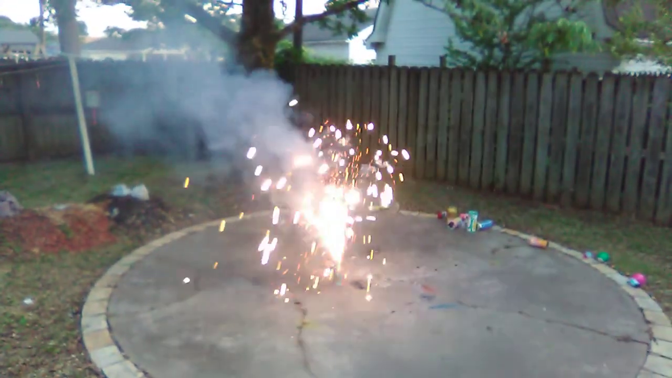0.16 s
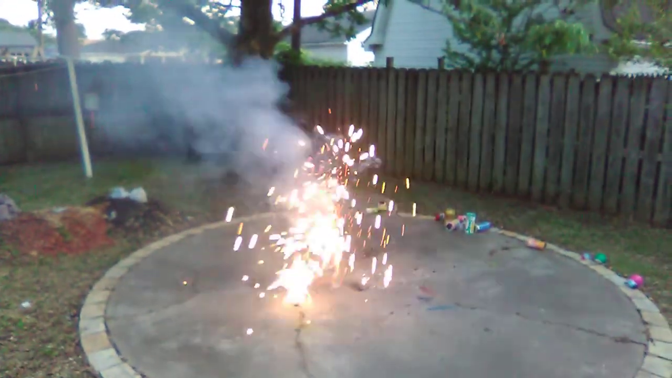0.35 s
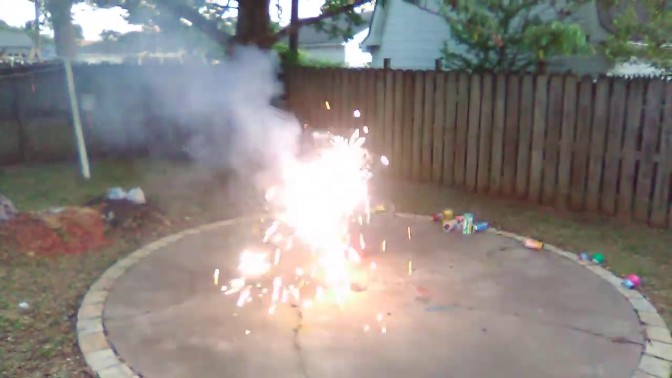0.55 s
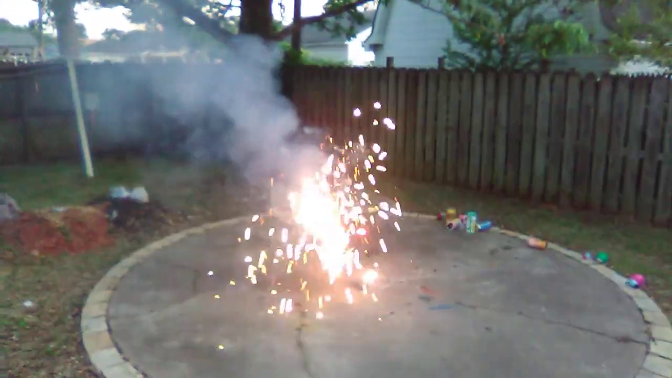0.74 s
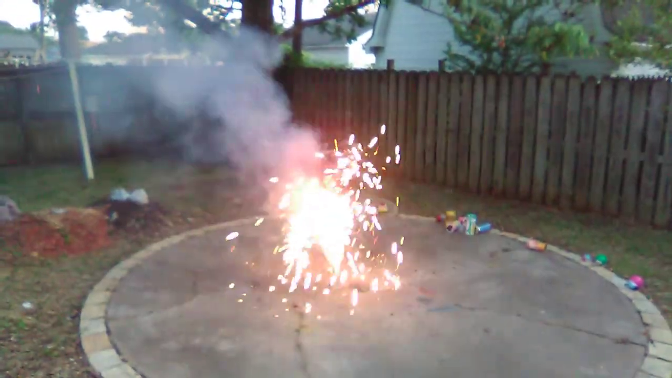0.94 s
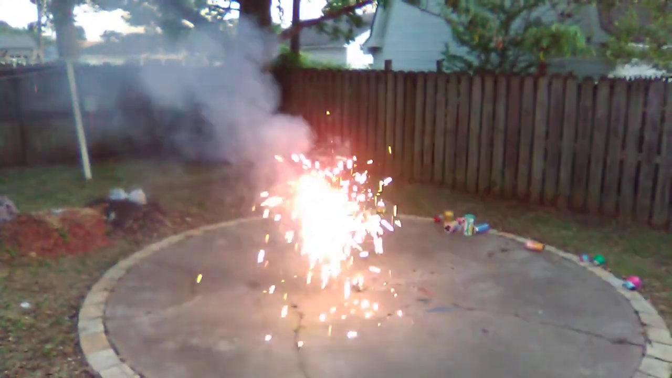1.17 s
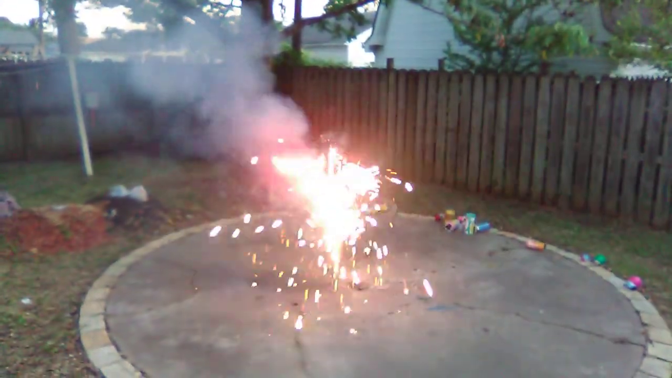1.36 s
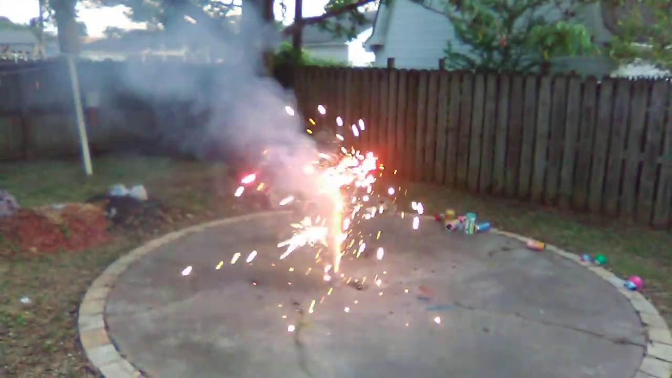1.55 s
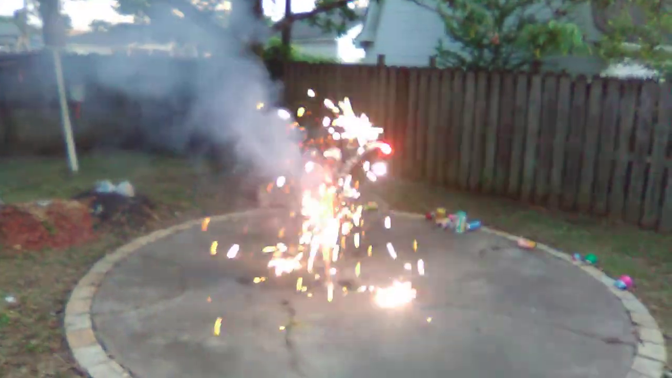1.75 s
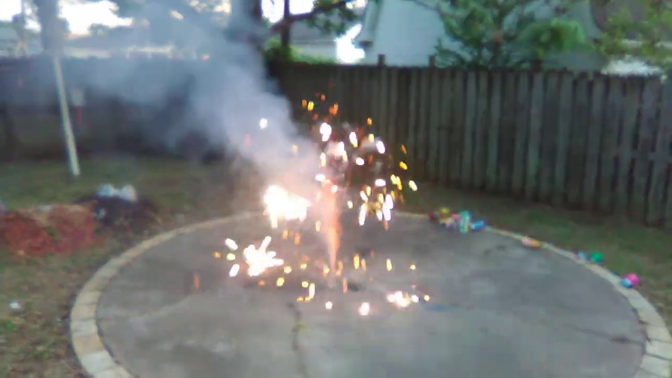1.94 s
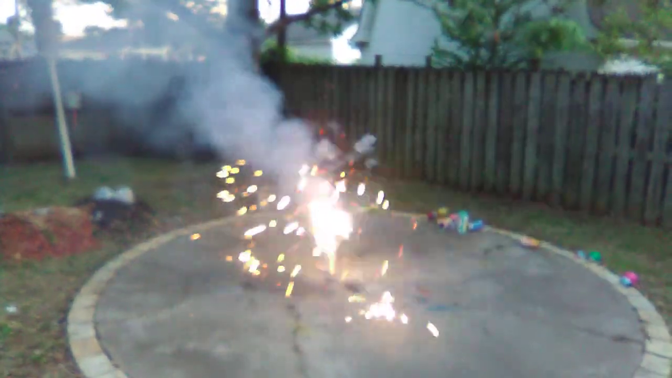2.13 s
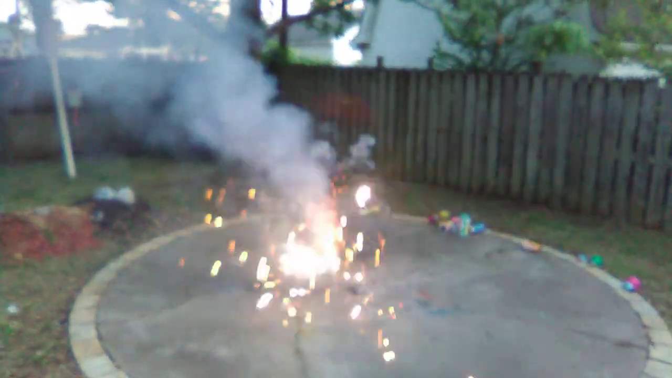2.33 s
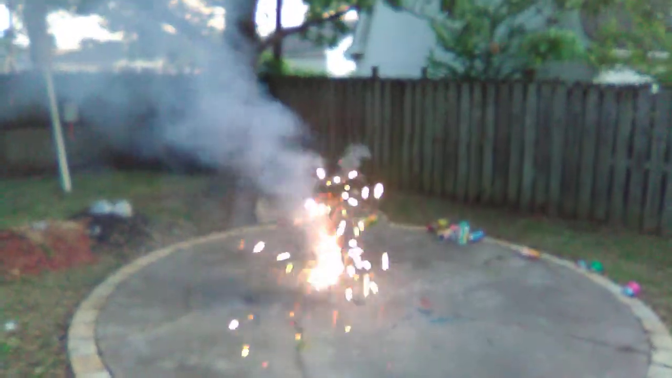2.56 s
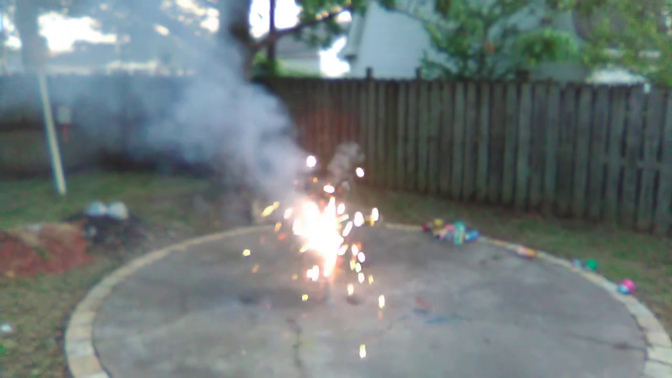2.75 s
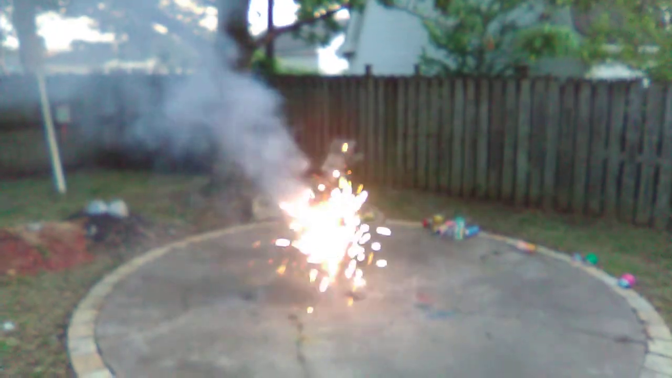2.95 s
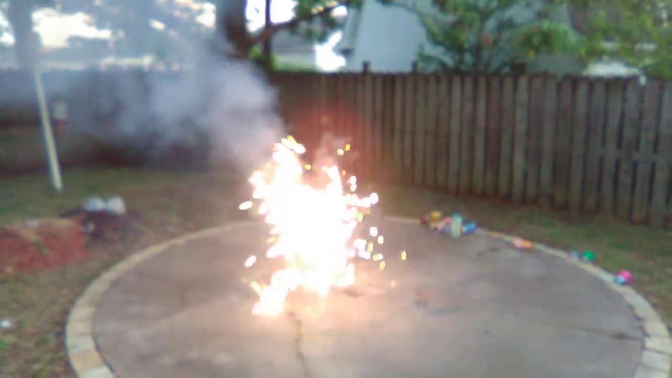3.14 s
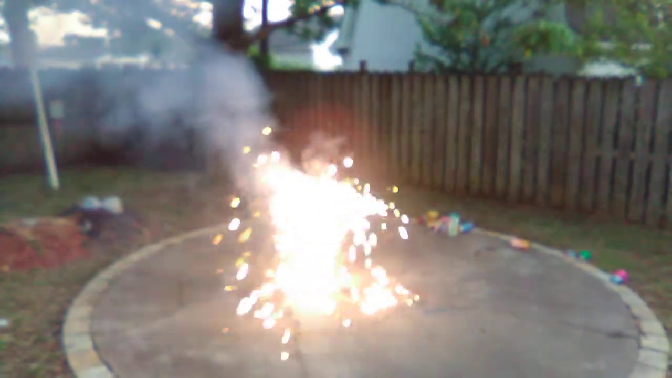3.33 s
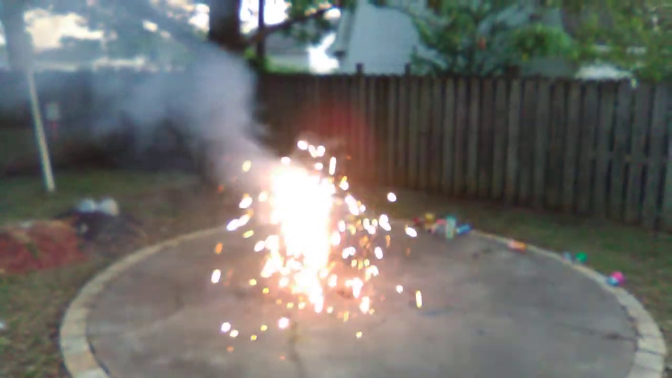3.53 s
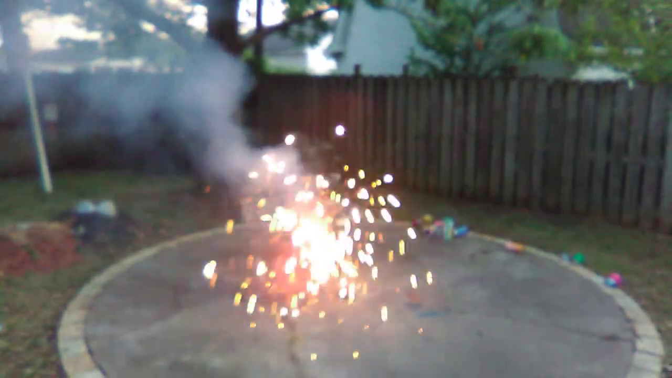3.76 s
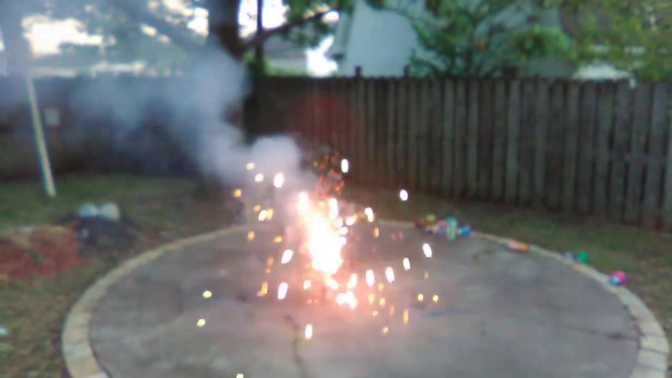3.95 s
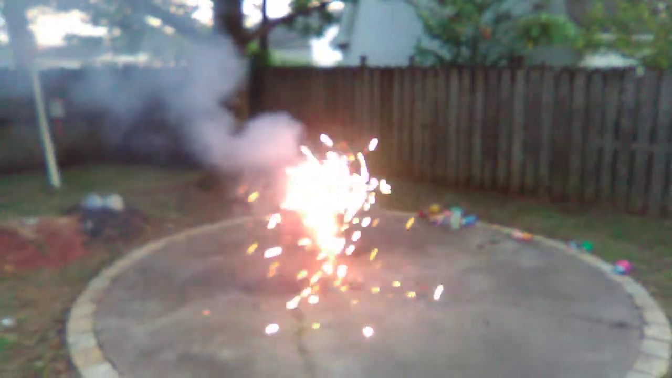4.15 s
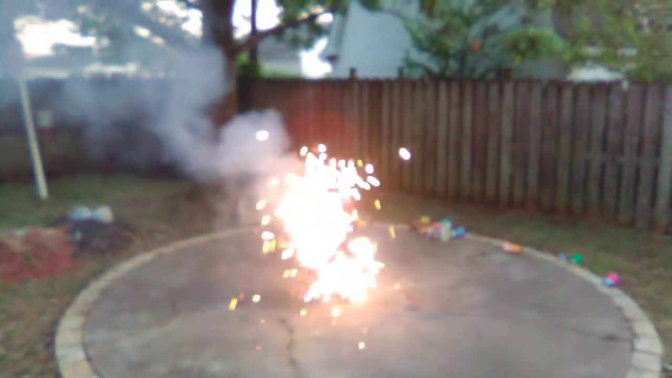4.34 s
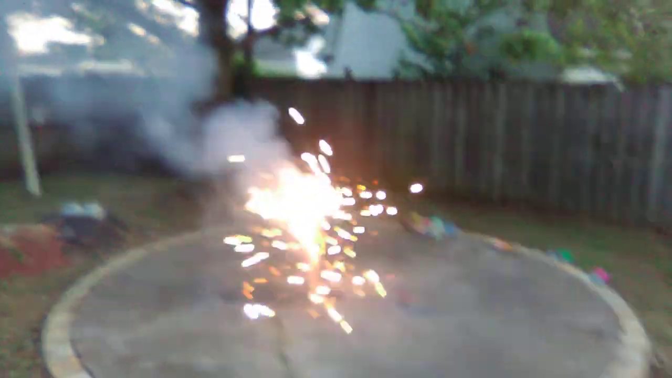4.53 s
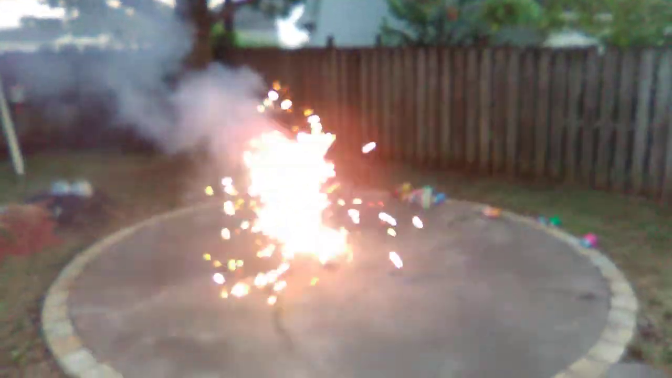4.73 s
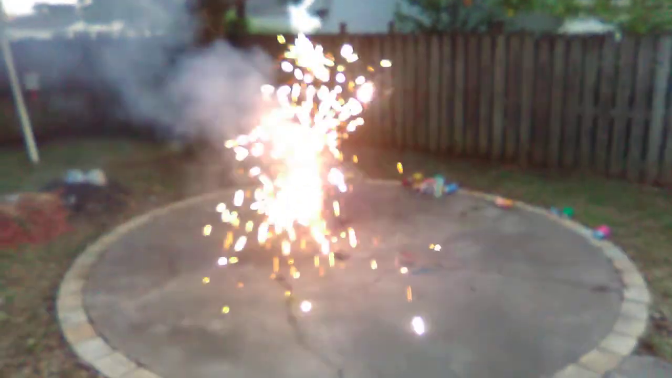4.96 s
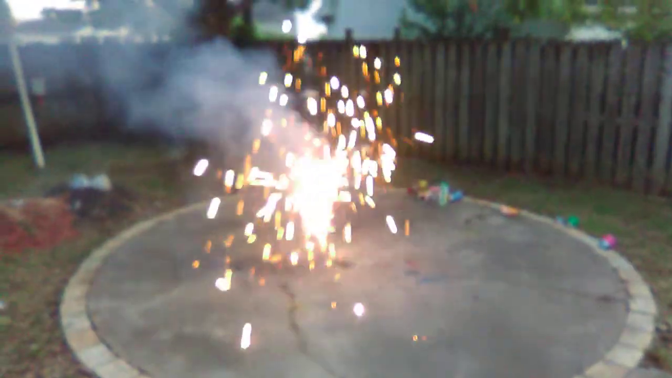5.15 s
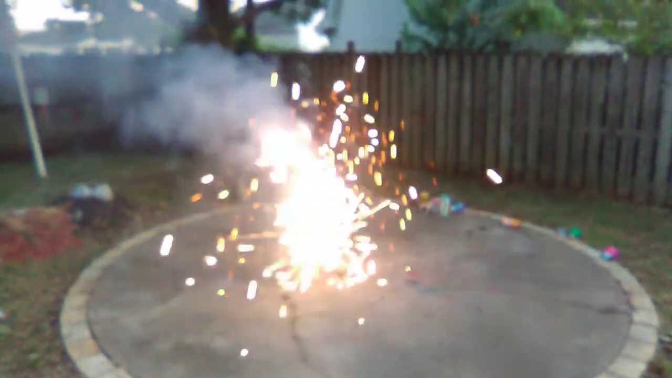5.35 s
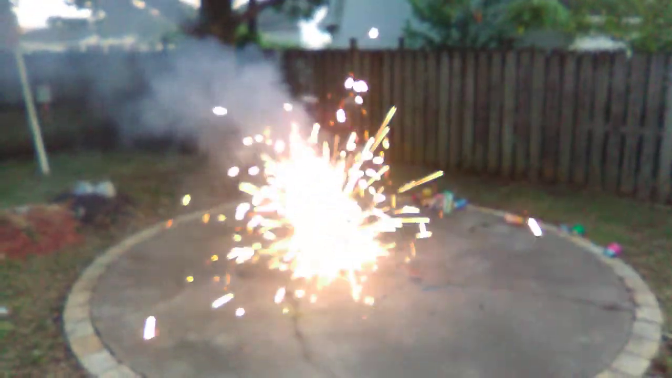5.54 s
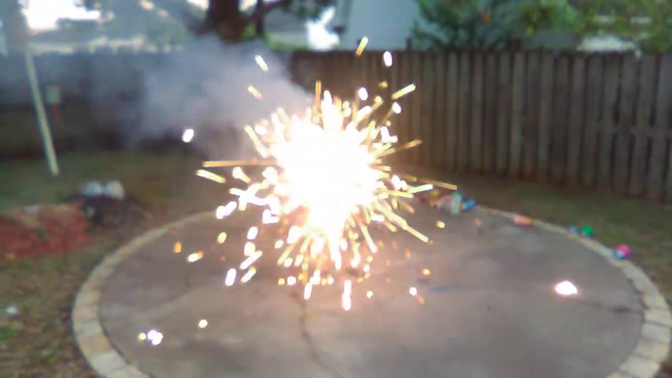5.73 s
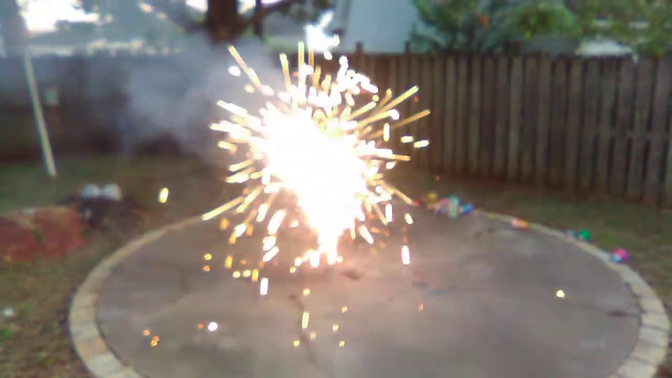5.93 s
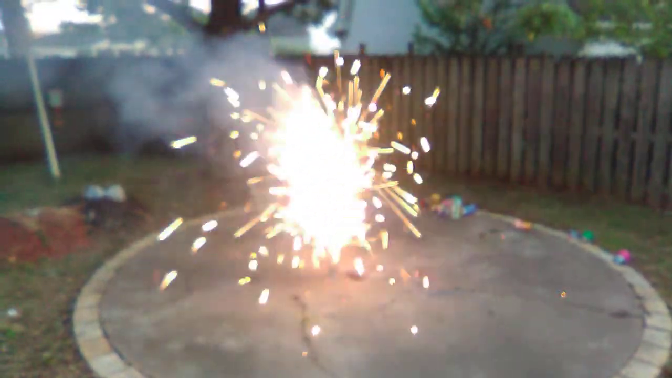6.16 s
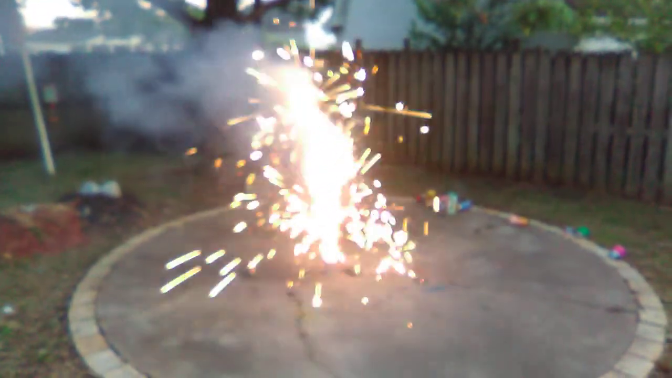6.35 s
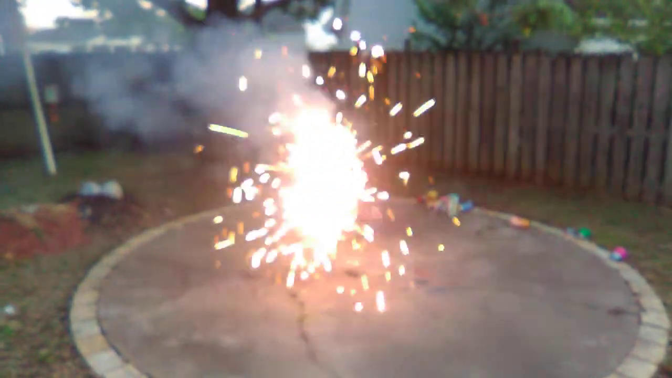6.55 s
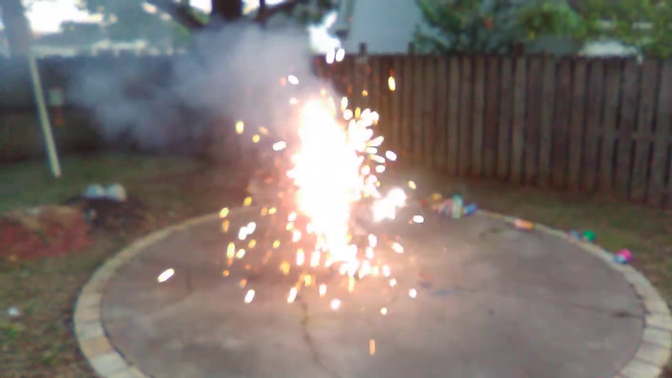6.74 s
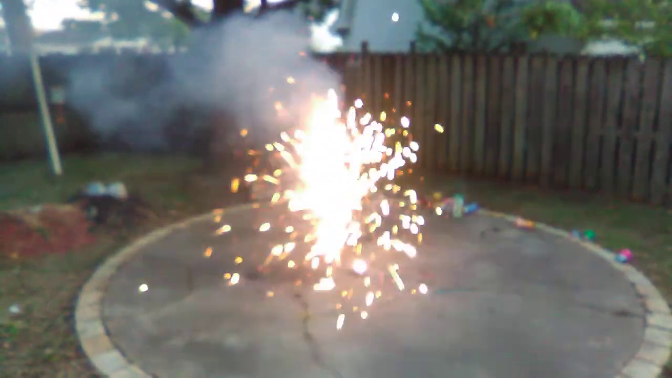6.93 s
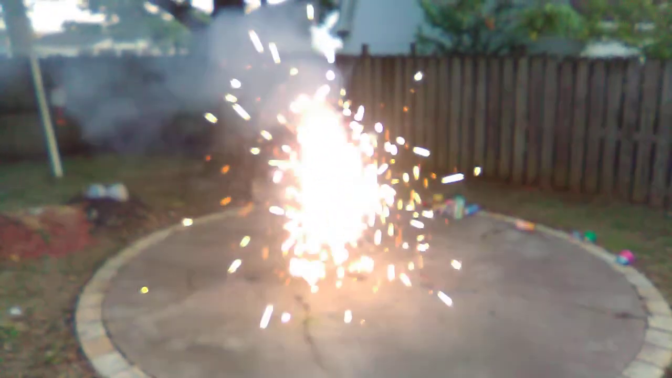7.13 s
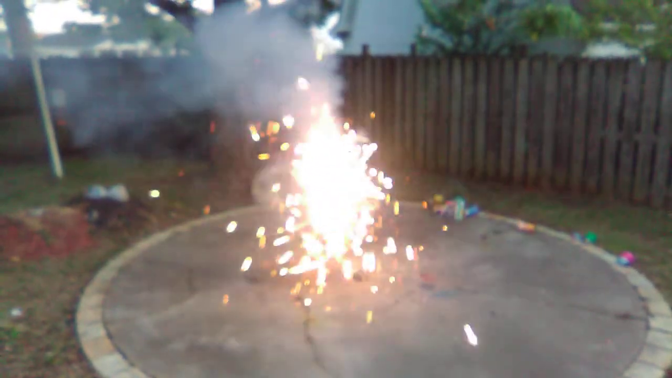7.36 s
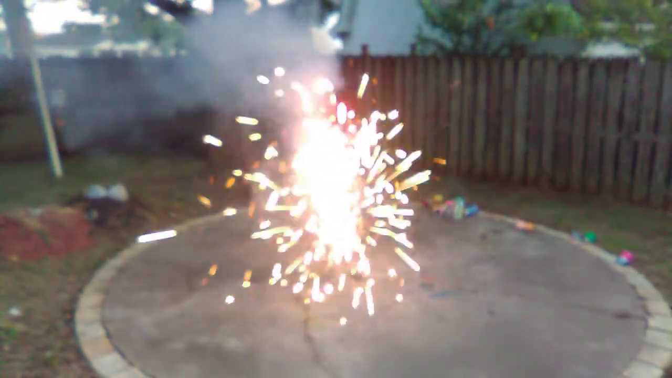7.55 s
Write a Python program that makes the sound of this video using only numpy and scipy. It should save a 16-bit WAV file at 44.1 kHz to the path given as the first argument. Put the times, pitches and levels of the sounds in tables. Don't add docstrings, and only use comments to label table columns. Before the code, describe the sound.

Close stereo pickup of a backyard firework: faint fizzing jet, low flame flutter, grainy spits and irregular snaps, some crisp and near, some dull in smoke. After a few much louder cracks, a sudden blast opens a roaring wall of crackle. It holds for about a second, then breaks into uneven bursts, distorted, with low bumps and momentary muffling, especially on the right.

```python
import sys
import numpy as np
from scipy import signal
from scipy.fft import rfft, irfft, next_fast_len
from scipy.io import wavfile
from scipy.ndimage import uniform_filter1d, map_coordinates

SR = 44100
rng = np.random.default_rng(int(sys.argv[2]) if len(sys.argv) > 2 else 0)


def waveform_to_disk(signal):
    frames = np.transpose(np.atleast_2d(signal))
    scaled = np.clip(frames, -1, 1) * 32767
    samples = np.round(scaled).astype(np.int16)
    wavfile.write(sys.argv[1], SR, samples)


def volts(x):
    e = np.asarray(x, float) / 20
    return 10 ** e


N = 339129

# start_s, peak_db, t60_s
THUMPS = [(0.209, -52, 0.22), (0.494, -51, 0.22), (0.59, -52, 0.22), (0.781, -51, 0.22), (1.034, -53, 0.22),
          (1.139, -52, 0.22), (1.282, -53, 0.22), (1.692, -43, 0.22), (2.014, -55, 0.22),
          (2.278, -56, 0.22), (2.841, -37, 0.22), (3.135, -46, 0.22), (3.184, -41, 0.22),
          (3.386, -43, 0.22), (3.779, -51, 0.22), (4.006, -52, 0.22), (4.223, -53, 0.22),
          (4.652, -41, 0.22), (4.755, -50, 0.22), (4.978, -43, 0.22)]
# start_s, peak_db, pitch_hz, t60_s
PUFFS = [(0.346, -30.5, 233, 0.16), (0.601, -32, 236, 0.12), (0.49, -40, 520, 0.3), (1.04, -37, 520, 0.5),
         (1.083, -29.5, 260, 0.4), (1.324, -38, 243, 0.24), (1.553, -37, 267, 0.15),
         (1.688, -31, 514, 0.16), (3.017, -41.5, 517, 0.21), (3.182, -34, 165, 0.22),
         (3.493, -35, 322, 0.13), (3.79, -23.5, 352, 0.12), (4.218, -33.5, 425, 0.21),
         (4.633, -32, 241, 0.21), (4.729, -27, 335, 0.11), (0.74, -37, 280, 0.2), (2.07, -47, 250, 0.3),
         (2.68, -42, 300, 0.3)]
# time_s, vigour_db, sharpness_db, left_minus_right_db
JET = [(0, -59, 0, 0), (.5, -55, 0, -2), (.8, -56, .8, -3.5), (1.5, -57, 1.5, -1.5), (1.75, -60, 0, -3.5),
       (2.3, -63, -3, -2.5), (2.6, -62, -3, -3), (2.99, -62, 4, -2.5), (3.1, -49, 5, -3.5),
       (3.52, -60, 4, -2), (3.63, -60, 3, -3), (3.9, -64, 3, 2.5), (4.05, -58, -6, 3.5),
       (4.26, -48, -11, 5.5), (4.58, -51, -7, 2.5), (4.75, -46, -7, 2), (4.9, -49, -11, 2),
       (5.22, -51, -3, 2.5)]
# frequency_hz, density_db (per Hz)
JET_COLOUR = [(90, -49), (140, -4.5), (240, -9.5), (500, -9), (960, -12.5), (1330, -7.5), (2450, -5),
              (4870, -10), (7010, -3), (14500, -14)]
# start_s, peak_db, rise_s, sizzle_minus_rush_db
FLARES = [(.01, -48, .02, 1.5), (.18, -48, .02, 1.5), (.33, -46, .03, 1.5), (.67, -47, .022, 0),
          (.85, -54, .05, 1.5), (1.385, -47, .03, 3), (1.54, -49, .015, 2.5), (1.66, -49, .03, -7),
          (3.02, -46, .04, 3), (3.81, -61, .04, 14), (4.63, -41, .025, -1.5), (4.94, -46, .025, 4),
          (5.1, -34, .014, 4)]
# start_s, length_s, gain_db
TOP_LIFTS = [
    (.18, .09, 7),
    (.33, .09, 3),
    (.48, .25, 5),
    (2.41, .16, 12),
    (2.83, .13, 3),
    (3.85, .15, -10),
    (4.07, .52, 11),
    (4.75, .2, 8),
]
# start_s, crack_peak_db, ring_hz, wash_t60_s
BARE_POPS = [(0.3186, -33, 1320, .34), (0.3416, -30, 3200, .25), (0.503, -33, 1500, .2),
             (0.4828, -32, 3530, .55), (0.5935, -30, 3370, .23), (1.086, -32, 726, .32),
             (1.1395, -23, 3320, .17), (1.4084, -28, 3160, .2), (1.8273, -36, 2550, .17),
             (1.9175, -39, 1420, .2), (2.0166, -35, 1340, .14), (2.0835, -39, 3560, .15),
             (2.2188, -31, 2310, .12), (2.3805, -31, 2520, .3), (2.7595, -47, 2540, .28),
             (2.8567, -24.5, 2250, .5), (3.018, -32, 2600, .83), (3.2284, -28, 1800, .46),
             (3.322, -36, 2570, .49), (3.3746, -29, 1190, .45), (3.4507, -27.5, 1340, .34),
             (3.572, -27, 3500, .1), (3.6535, -24.5, 2460, .26), (3.766, -27.5, 1550, .28),
             (3.7798, -30, 2600, .2), (4.6001, -24, 2760, .54), (4.6692, -10, 3370, .7),
             (5.0015, -10, 2500, .4), (5.0841, -4, 2530, .16), (5.1058, -17, 3740, .24)]
# start_s, crack_peak_db, ring_hz, wash_t60_s
VEILED_POPS = [(0.2882, -46, 1570, .2), (0.4686, -34, 3250, .33), (1.0363, -36, 1860, .27),
               (1.281, -46, 2640, .25), (1.326, -43, 1920, .84), (1.7697, -39, 1820, .14),
               (2.1844, -44, 940, .36), (2.2813, -34, 1500, .16), (2.4823, -40, 1740, .42),
               (2.607, -43, 1490, .41), (2.645, -43, 2550, .46), (2.6895, -41, 3120, .33),
               (2.826, -31, 1590, .15), (3.9766, -45, 2460, .39), (4.008, -42.5, 2670, .39),
               (4.0711, -35, 2550, .22), (4.1323, -28, 2320, .56), (4.22, -34, 2300, .4),
               (4.351, -35, 1710, .58), (4.4132, -35, 1320, .18), (4.5342, -33, 3070, .18),
               (4.869, -29.5, 2120, .098)]
# start_s, peak_db, left_minus_right_db
SNAPS = [(0.3192, -30, 0.0), (0.3416, -28, -1.0), (0.5955, -26, -5.5), (1.034, -32, 0.0),
         (1.0874, -30, -2.0), (1.1393, -18, -3.0), (1.282, -39, -0.5), (1.3254, -37, -5.5),
         (1.4092, -20, -0.5), (1.8282, -33, -1.5), (2.0158, -39, -3.0), (2.0852, -39, 2.5),
         (2.1844, -45, -2.5), (2.2184, -27, -8.0), (2.2822, -36, -1.5), (2.3795, -29, 2.0),
         (2.4254, -29, -2.0), (2.4803, -37, -7.5), (2.607, -43, 0.0), (2.7591, -44, 0.5),
         (2.8275, -32, -8.0), (2.8374, -28, -7.0), (2.8564, -21, -3.0), (3.016, -28, -4.5),
         (3.2271, -24, -2.0), (3.3752, -26, -5.5), (3.4511, -26, -4.0), (3.5713, -25, -5.5),
         (3.6536, -26, -2.0), (3.7668, -25, -2.5), (3.9794, -41, 6.0), (4.0726, -29, 4.5),
         (4.1315, -25, 1.5), (4.349, -31, 6.5), (4.5351, -30, 6.5), (4.6014, -23, 0.5), (4.6683, -10, 2.0),
         (4.8708, -21, 5.0), (5.001, -9, -1.5), (5.0838, -4, -1.0)]
# start_s, peak_db, pitch_hz
SPITS = [(0.028, -42, 1450), (0.289, -41, 1570), (0.319, -38, 1380), (0.381, -38, 1370), (0.6, -38, 2140),
         (0.694, -39, 2500), (0.778, -42, 2250), (1.018, -42, 681), (1.035, -36, 1980), (1.08, -34, 1280),
         (1.138, -38, 1840), (1.325, -42, 1930), (1.694, -37, 2290), (1.775, -38, 1910), (2.016, -41, 1350),
         (2.187, -47, 1070), (2.282, -37, 902), (2.381, -39, 1570), (2.503, -42, 1810), (2.607, -43, 1520),
         (2.646, -40, 2420), (2.827, -33, 1610), (2.857, -37, 2270), (2.917, -38, 1570), (3.015, -47, 2370),
         (3.036, -40, 1730), (3.153, -36, 891), (3.182, -35, 1110), (3.229, -31, 1840), (3.282, -32, 1510),
         (3.387, -36, 1140), (3.45, -38, 1310), (3.489, -38, 1530), (3.571, -44, 1510), (3.651, -36, 1590),
         (3.657, -33, 1680), (3.768, -43, 1550), (4.075, -35, 2090), (4.132, -33, 2210), (4.216, -35, 2160),
         (4.233, -33, 2190), (4.27, -35, 2390), (4.327, -36, 2280), (4.35, -36, 1730), (4.369, -33, 1450),
         (4.412, -35, 1330), (4.535, -38, 2330), (4.601, -29, 2420), (4.655, -30, 2500), (4.668, -24, 2080),
         (4.73, -28, 2400), (4.783, -32, 2020), (4.804, -34, 1420), (4.871, -31, 2110), (4.949, -37, 1840),
         (4.98, -30, 1840), (5.001, -22, 2410), (5.042, -35, 2120), (5.083, -13, 2430), (5.115, -26, 1740)]
# start_s, sizzle_db, hold_s, fade_db_per_s, rush_minus_sizzle_db
VOLLEYS = [(5.239, -10.5, .04, 265, -3), (5.35, -12.5, .1, 120, -4), (5.47, -13, .9, 150, -2.5),
           (6.39, -14, .09, 190, -3), (6.537, -12.5, .09, 135, -5), (6.738, -13, .004, 900, -7),
           (6.742, -19, .03, 150, -6), (6.8, -13, .03, 100, -3), (6.84, -12, .035, 280, -5),
           (6.936, -10.5, .03, 250, -7), (7.027, -11.5, .11, 100, -8), (7.191, -11.5, .05, 80, -9),
           (7.29, -12.5, .05, 90, -6.5), (7.423, -13.5, .04, 250, -10), (7.504, -16, .008, 200, -12),
           (7.534, -12, .115, 300, -10)]
# start_s, crack_peak_db, left_minus_right_db
BLASTS = [(5.2387, -6, -2), (5.351, 5, 1), (6.5368, -3, 0), (6.7383, 1.5, 10), (6.7615, -6, 0),
          (6.7996, 5, 5), (6.8099, 0, 12), (6.9358, 5, 5), (7.0263, 5, 13), (7.1927, 6, -9),
          (7.4238, -1, -6), (7.5037, -3.5, 6.5), (7.551, -4, -10)]
# frequency_hz, density_db (per Hz)
VOLLEY_COLOUR = [(180, -31), (300, -11.5), (590, -12.5), (810, -8), (1450, -8), (1970, -4), (2960, -5),
                 (4900, -4.5), (6760, 0.5), (11700, -3), (14300, 0.5)]
# frequency_hz, left_minus_right_db
VOLLEY_BALANCE = [(300, 4), (600, 1), (1300, 3), (2500, 2.5), (4500, 2), (6500, 5.5), (9000, -2),
                  (14000, -3)]
# start_s, bias_kick (full scale = 1), deafening_db
LEFT_KICKS = [(5.2414, -.42, 6.5), (5.4648, -.64, 9), (5.5147, -.52, 7), (5.5656, -.76, 12),
              (5.573, .67, 4), (5.6072, .5, 4), (5.773, .42, 2), (5.9434, -.32, 8), (5.9692, -.36, 10),
              (5.9765, .26, 2), (6.0104, -.41, 0), (6.3885, -.3, 0), (7.3105, .59, 5), (7.435, .3, 1.1),
              (7.5675, -.7, 4)]
# start_s, bias_kick (full scale = 1), deafening_db
RIGHT_KICKS = [(5.2398, -1.13, 30), (5.3494, -.46, 2), (5.4639, -.67, 5.8), (5.515, .36, 6.9),
               (5.542, -.84, 2), (5.5724, .75, 8), (5.6571, -.58, 10), (5.728, 1.5, 7.6),
               (5.7728, -.7, 1.6), (5.8738, -.77, 8), (5.9052, -.69, 2), (5.9688, .9, 4.5),
               (6.0104, -.79, 9.6), (6.1138, .98, .9), (6.1348, -.53, .6), (6.148, .88, 18),
               (6.1921, -.8, 12), (6.2818, -1.04, 7), (6.3531, 1.24, 5), (6.3914, 1.01, 11),
               (6.4208, -.77, 1.1), (6.8005, -.52, 1.1), (6.8323, .88, 26), (7.0282, -.65, 17),
               (7.0865, .88, 2.7), (7.0988, -.6, 17), (7.19, -.67, 6), (7.3045, .79, .8), (7.533, -.58, 38),
               (7.5519, 1.3, 5)]
# start_s, length_s, loss_db, fade_s
RIGHT_STALLS = [
    (5.239, .017, 61, .003),
    (5.255, 0.0085, 15, .002),
    (5.288, 0.046, 57, 0.046),
    (6.803, 0.0055, 10, 0.0022),
    (6.82, .014, 18, .004),
    (6.893, .034, 22, 0.035),
    (6.936, 0.0062, 38, .002),
    (7.528, 0.012, 30, .003),
]

SPLIT_HZ, TOP_HZ, CUTOFF_HZ = 5000, 11950, 14200


def rms_one(x):
    return x / np.sqrt(np.mean(x ** 2) + 1e-20)


def add_at(out, start_s, sound):
    out[:, round(start_s * SR):][:, :sound.shape[-1]] += sound


def in_time(rows):
    time_s, *columns = np.transpose(rows)
    return [np.interp(np.arange(N) / SR, time_s, column) for column in columns]


def sides(pan_db):
    return volts(np.array([pan_db / 2, -pan_db / 2]))


def drift(rate_hz):
    r = np.exp(-80 * np.pi * rate_hz / SR)
    slow = signal.lfilter([1], [1, -2 * r, r * r], rng.standard_normal(N // 40 + 2002))[2000:]
    return np.interp(np.arange(N) / 40, np.arange(len(slow)), rms_one(slow))


def ring(x, hz, t60_s):
    r, w = volts(-60 / (t60_s * SR)), 2 * np.pi * hz / SR
    return signal.lfilter([0, np.sin(w)], [1, -2 * r * np.cos(w), r * r], x + 1e-18)


def high_pass(x, order, hz):
    return signal.sosfilt(signal.butter(order, hz, "high", fs=SR, output="sos"), x)


def crackle(per_s, spread_db, alike, echo_db):
    snaps = (rng.random((3, N)) < per_s / SR) * rng.choice([-1, 1], (3, N))
    snaps = rms_one(snaps * volts(spread_db * np.minimum(rng.exponential(1, (3, N)), 4)))
    mix = snaps + volts(echo_db) * rng.standard_normal((3, N))
    return np.sqrt(alike) * mix[0] + np.sqrt(1 - alike) * mix[1:]


def patches(x, patchy_db, span_s, octaves):
    hz, s, frames = signal.stft(x, SR, nperseg=256)
    pitch = np.log2(np.maximum(hz, 100) / 100)
    grid = np.meshgrid(pitch / octaves, s / span_s, indexing="ij")
    field = [map_coordinates(rng.standard_normal((64, 1024)), grid, order=1, mode="wrap") for _ in range(3)]
    gain = volts(patchy_db * (field[0] + 0.5 * np.array(field[1:])))
    return signal.istft(frames * gain, SR)[1][:, :N]


def bands(x, colour, balance=((100, 0), (10000, 0))):
    size = next_fast_len(N)
    hz = np.maximum(np.arange(size // 2 + 1) * SR / size, 1)

    def read(points):
        point_hz, db = np.transpose(points)
        return np.interp(np.log(hz), np.log(point_hz), db)

    spectrum = rfft(x, size) * volts(read(colour)) * sides(read(balance))
    high = 1 / (1 + np.minimum(SPLIT_HZ / hz, 10) ** 50)
    top = 1 / (1 + np.minimum(TOP_HZ / hz, 10) ** 60)
    shares = (1 - high, high * (1 - top), top)
    return np.array([rms_one(irfft(spectrum * np.sqrt(share), size)[:, :N]) for share in shares])


def sputter(per_s, spread_db, t60_s, bed_db):
    born = (rng.random(N) < per_s / SR) * volts(2 * spread_db * np.minimum(rng.exponential(1, N), 2))
    power = signal.lfilter([1], [1, -volts(-120 / (t60_s * SR))], born)
    return rms_one(np.sqrt(power / power.mean() + volts(2 * bed_db)))


def cracks(rows):
    out, t = np.zeros((2, N + 400)), np.arange(400) / SR
    bounce = 0.8 * (t > 0.0008) * np.exp(-np.abs(t - 0.0008) / 0.0006)
    shape = np.exp(-t / 0.0005) + bounce
    for (s, db, pan_db), noise in zip(rows, rng.standard_normal((len(rows), 3, 400))):
        burst = high_pass(shape * (noise[0] + 0.9 * noise[1:]), 2, 1300)
        add_at(out, s, volts(db) * sides(pan_db)[:, None] * burst / np.abs(burst).max())
    return out[:, :N]


def flame(vigour_db):
    t = np.arange(SR // 3) / SR
    level = volts(-65.5 + 0.4 * vigour_db + 1.9 * drift(17))
    hum = ring(rng.standard_normal(N) + 0.29 * rng.standard_normal((2, N)), 94, 0.07)
    out = level * rms_one(high_pass(hum, 5, 58))
    for (s, db, t60_s), detune in zip(THUMPS, rng.normal(1, 0.06, len(THUMPS))):
        swell = volts(db + 2.5 - 60 * t / t60_s) * (1 - np.exp(-t / 0.009))
        add_at(out, s, swell * np.sin(2 * np.pi * 90 * detune * t))
    return out


def puffs():
    out, t = np.zeros((2, N)), np.arange(SR // 4) / SR
    for (s, db, hz, t60_s), noise in zip(PUFFS, rng.standard_normal((len(PUFFS), 3, len(t)))):
        air = rms_one(ring(noise[0] + 0.22 * noise[1:], hz, 6.3 / hz))
        add_at(out, s, volts(db - 14.5 - 60 * t / t60_s) * (1 - np.exp(-t / 0.0029)) * air)
    return high_pass(out, 2, 90)


def spits():
    out, t = np.zeros((2, N)), np.arange(SR // 16) / SR
    envelope = volts(-60 * t / 0.055) * (1 - np.exp(-t / 0.0015))
    for (s, db, hz), noise in zip(SPITS, rng.standard_normal((len(SPITS), 3, len(t)))):
        t60_s = 6.0 / hz
        burst = ring(ring(noise[0] + 0.7 * noise[1:], hz, t60_s), hz, t60_s) * envelope
        add_at(out, s, volts(min(db, -31) - 2.5) * burst / np.abs(burst.mean(axis=0)).max())
    return high_pass(out, 2, 450)


def star_snaps():
    near_db = -22
    rows = [(s, db - 2.5 + 0.46 * max(db - near_db, 0), pan_db) for s, db, pan_db in SNAPS]
    snaps = cracks(rows)
    return snaps + 0.12 * ring(snaps, 2900, 0.002)


def pop_washes(sharp_db):
    pops = [(*row, 3.5, -10) for row in BARE_POPS]
    pops += [(*row, -9, -4) for row in VEILED_POPS]
    t = np.arange(SR // 2) / SR
    power, rings = np.zeros((3, N)), np.zeros((2, N))
    swell = 1 - 0.75 * np.exp(-t / 0.005)
    usual_db, lag = -30, 0.43
    noises = rng.standard_normal((len(pops), 3, len(t)))
    for (s, db, hz, t60_s, sizzle_db, wash_db), noise in zip(pops, noises):
        sizzle_db = sizzle_db + 0.6 * sharp_db[round(s * SR)]
        peak_db = db + wash_db - lag * max(db - usual_db, 0)
        wash = volts(peak_db - 60 * t / np.clip(t60_s, 0.03, 2)) * swell
        gains = volts(np.array([-6.0, sizzle_db - 4.5, sizzle_db - 6]))
        add_at(power, s, (gains[:, None] * wash) ** 2)
        body = rms_one(ring(noise[0] + 0.81 * noise[1:], hz, 8.0 / hz))
        add_at(rings, s, volts(-6.5 - 60 * t / 0.19) * wash * body)
    return power, high_pass(rings, 2, 650)


def flares():
    power, t = np.zeros((3, N)), np.arange(SR // 2) / SR
    for s, db, rise_s, sizzle_db in FLARES:
        flare = volts(db) * t / rise_s * np.exp(1 - t / rise_s)
        gains = volts(np.array([0, sizzle_db, sizzle_db - 3.0]))
        add_at(power, s, (gains[:, None] * flare) ** 2)
    return power


def top_lift():
    t = np.arange(N) / SR
    return volts(sum(db * ((t > s) & (t < s + length_s)) for s, length_s, db in TOP_LIFTS))


def hiss(power, sharp_db):
    sparks = patches(crackle(900, 2.6, alike=0.3, echo_db=4), patchy_db=3.3, span_s=0.025, octaves=0.25)
    rush, sizzle, top = np.sqrt(power)[:, None] * bands(sparks, JET_COLOUR)
    body = signal.sosfiltfilt(signal.butter(2, 1000, fs=SR, output="sos"), rush)
    rush = rush - 0.45 * (sharp_db < -2.5) * body
    low_sizzle = signal.sosfiltfilt(signal.butter(4, 8000, fs=SR, output="sos"), sizzle)
    sound = rush + sizzle + top + low_sizzle * (volts(-0.65 * sharp_db) - 1)
    return sound * sputter(70, 3.2, 0.06, bed_db=0)


def jet_and_pops():
    rush_db, sharp_db, pan_db = in_time(JET)
    power = volts(np.array([rush_db, rush_db - 3 + sharp_db, rush_db - 4 + 1.2 * sharp_db])) ** 2
    wash_power, rings = pop_washes(sharp_db)
    power += wash_power + flares()
    power[2] *= top_lift() ** 2
    spray = sides(pan_db) * (hiss(power, sharp_db) + rings + spits())
    vigour_db = rush_db - np.mean(JET, axis=0)[1]
    burning = np.arange(N) / SR < VOLLEYS[0][0]
    return burning * (spray + star_snaps() + flame(vigour_db))


def volleys():
    t, power = np.arange(N) / SR, np.zeros((2, N))
    for s, db, hold_s, fade_db_per_s, rush_db in VOLLEYS:
        rise = np.clip((t - s) / 0.002, 0, 1)
        level = rise * volts(db - fade_db_per_s * np.maximum(t - s - hold_s, 0))
        power += (level * volts(np.array([[rush_db], [0]]))) ** 2
    sparks = crackle(4000, 8.8, alike=0.071, echo_db=13.0)
    sparks = patches(sparks, patchy_db=1.5, span_s=0.03, octaves=0.3)
    rush, sizzle, top = bands(sparks, VOLLEY_COLOUR, VOLLEY_BALANCE)
    flicker = volts(1.06 * np.array([drift(60), drift(40)]))
    roar = np.sqrt(power[0]) * rush + np.sqrt(power[1]) * (sizzle + volts(-2.8) * top)
    return volts(1.0) * sides(-1.2)[:, None] * flicker * roar + cracks(BLASTS)


def scene():
    return puffs() + jet_and_pops() + volleys()


def overload(x, kicks, stalls, shakes):
    t = np.arange(SR // 10) / SR
    deaf_db, bias = np.zeros(N + len(t)), np.zeros(N)
    for s, kick, db in kicks:
        at, recovery_s = round(s * SR), 0.011 + 0.0003 * db
        deaf_db[at:at + len(t)] += db * (1 - np.exp(-t / 0.0021)) * np.exp(-(t / recovery_s) ** 4)
        bias[at] += kick
    for s, length_s, db, fade_s in stalls:
        waking = np.exp(-np.maximum(t - length_s, 0) / 0.0067)
        deaf_db[round(s * SR):][:len(t)] += db * np.clip(t / fade_s, 0, 1) * waking
    heard = x * volts(-deaf_db[:N])
    bias += shakes * uniform_filter1d(heard ** 2, size=400) ** 1.62
    coupling_hz, coupling_q, kick_s = 65.6, 2.02, 0.0012
    w = 2 * np.pi * coupling_hz
    coupling = signal.bilinear([1, 0, 0], [1, w / coupling_q, w * w], SR)
    step = signal.lfilter([1], [1, -np.exp(-1 / (kick_s * SR))], bias + 1e-18)
    thump = signal.lfilter(*coupling, step)
    return heard + signal.sosfilt(signal.butter(4, 1200, fs=SR, output="sos"), thump)


def drop_masked(x, under_db, from_hz):
    hz, s, frames = signal.stft(x, SR, nperseg=2048)
    power = np.mean(np.abs(frames) ** 2, axis=0)
    moment = power[(hz > 1000) & (hz < CUTOFF_HZ)].mean(axis=0)
    narrow = np.repeat(power[:1024].reshape(512, 2, -1).mean(axis=1), 2, axis=0)
    hz = hz[:1024, None]
    margin_db = under_db + 5 * (hz > SPLIT_HZ)
    weak = narrow < moment * volts(-2 * margin_db)
    lasting = uniform_filter1d(uniform_filter1d(narrow, size=3, axis=1), size=4, axis=0)
    streaks = (lasting < uniform_filter1d(lasting, size=40, axis=0) * volts(-5.6)) & (hz < 4500)
    streaks = uniform_filter1d(1. * streaks, size=3, axis=1) > 0.01
    affected = (hz > from_hz) & (hz < TOP_HZ)
    frames[:, :1024] *= np.where((weak | streaks) & affected, 0.05, 1)
    return signal.istft(frames, SR)[1][:, :N]


def top_cut(x):
    return signal.sosfilt(signal.butter(12, 15130, fs=SR, output="sos"), x)


def record(dry):
    shakes = rng.standard_normal(N) * (rng.random(N) < 150 / SR)
    left = overload(dry[0], LEFT_KICKS, [], volts(4.0) * shakes)
    right = overload(dry[1], RIGHT_KICKS, RIGHT_STALLS, volts(5.0) * np.roll(shakes, shift=SR))
    squeezed = 1.447 * np.tanh(np.array([left, right]) / 1.211)
    thinned = drop_masked(squeezed, under_db=5.2, from_hz=2600)
    cut = signal.sosfilt(signal.ellip(10, 0.5, 60, CUTOFF_HZ, fs=SR, output="sos"), thinned)
    mix = np.clip(cut, -1.15, 1.15)
    return top_cut(mix)


dry = scene()
out = record(dry)
waveform_to_disk(out)
```